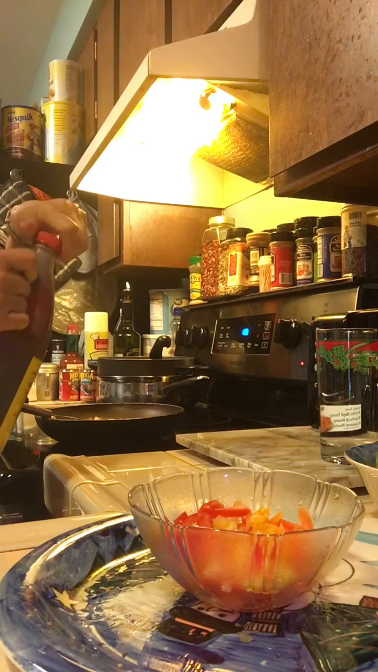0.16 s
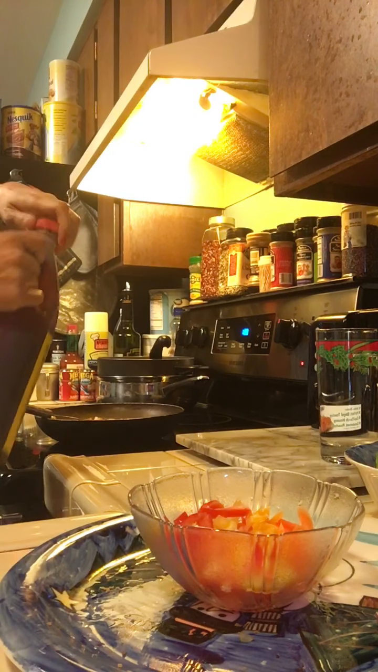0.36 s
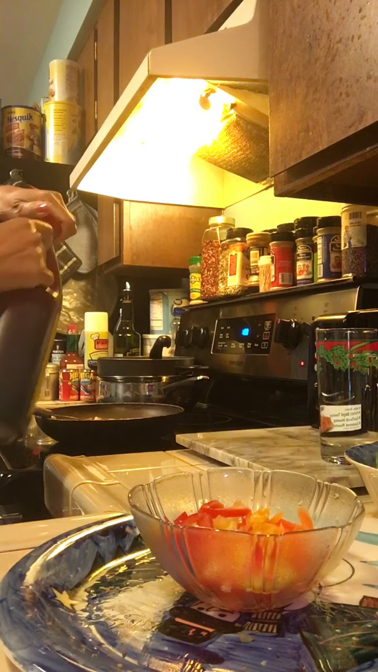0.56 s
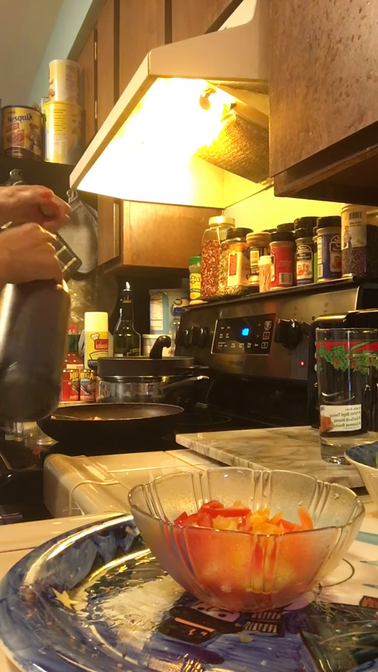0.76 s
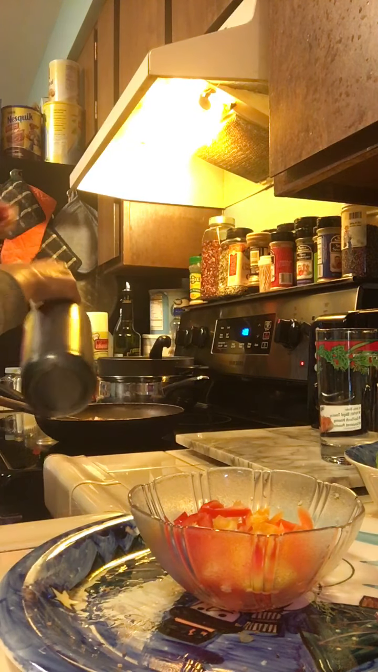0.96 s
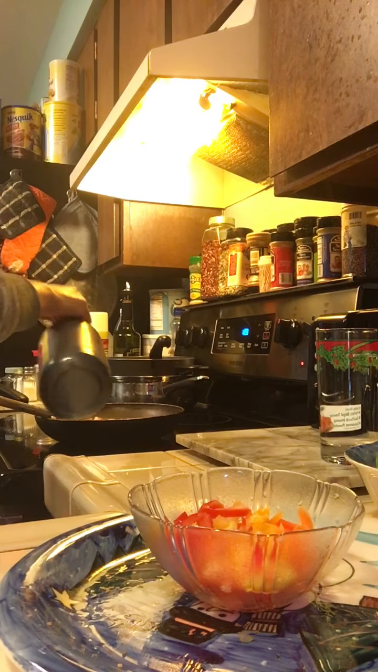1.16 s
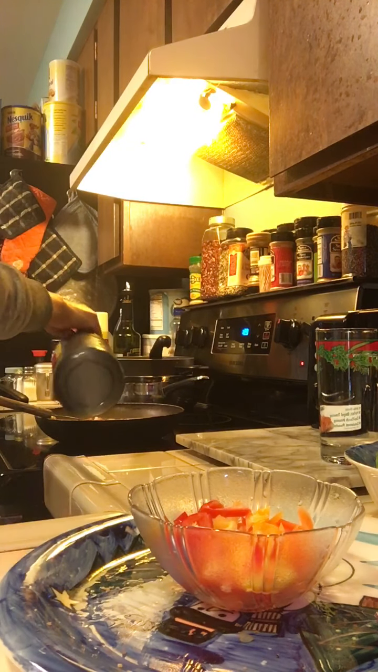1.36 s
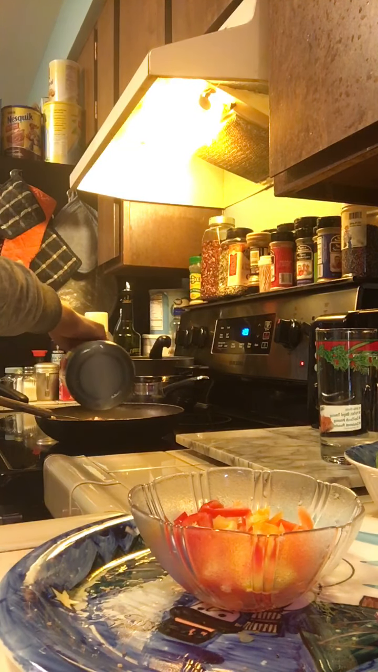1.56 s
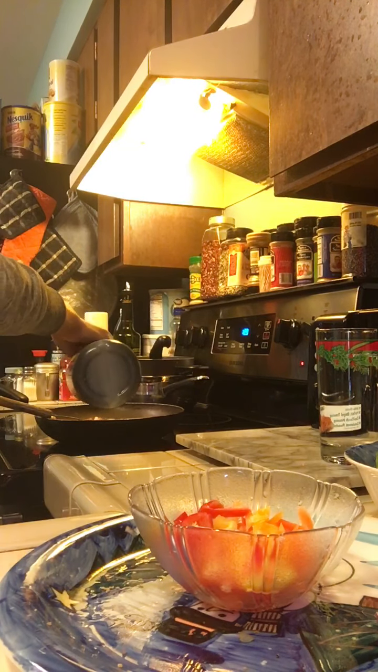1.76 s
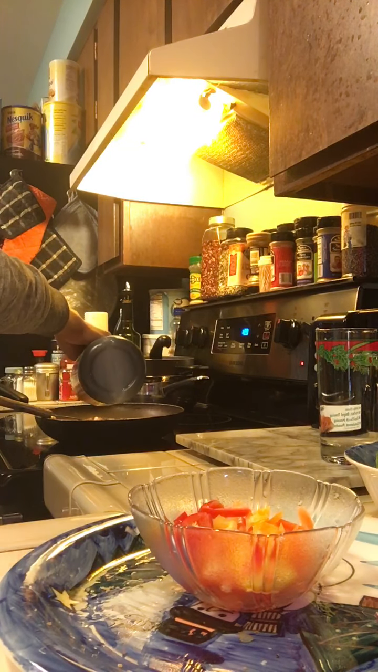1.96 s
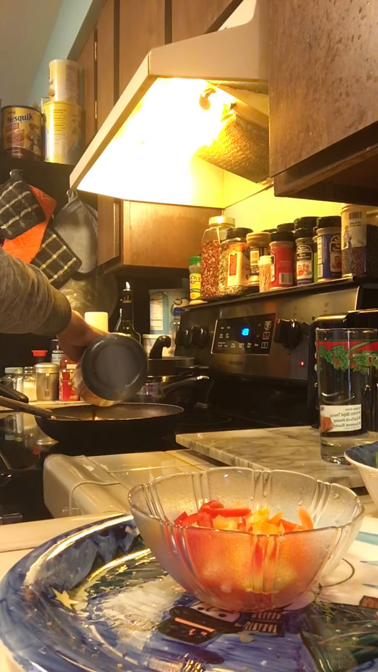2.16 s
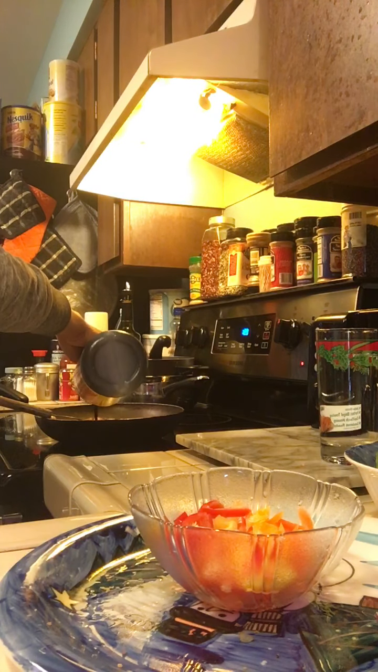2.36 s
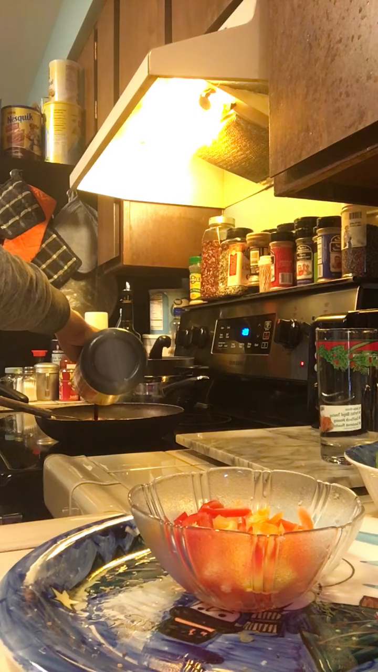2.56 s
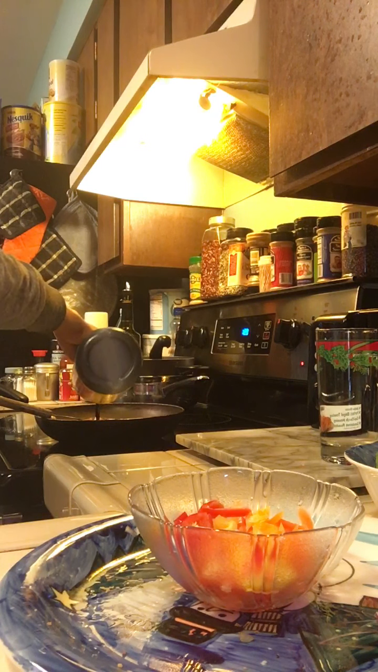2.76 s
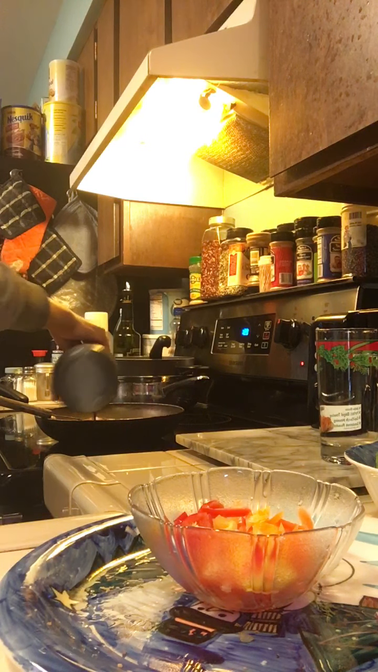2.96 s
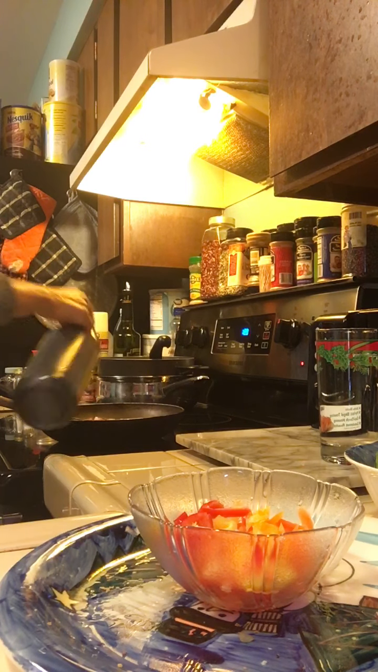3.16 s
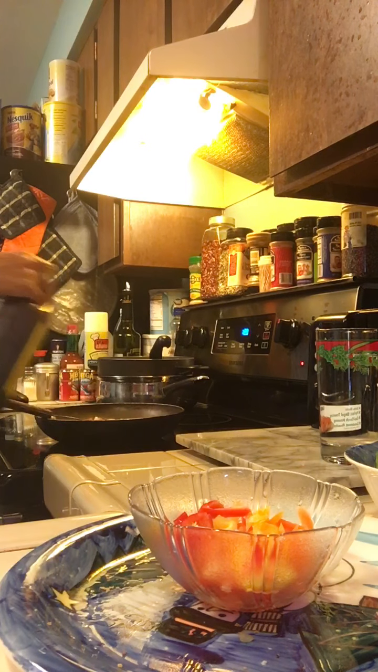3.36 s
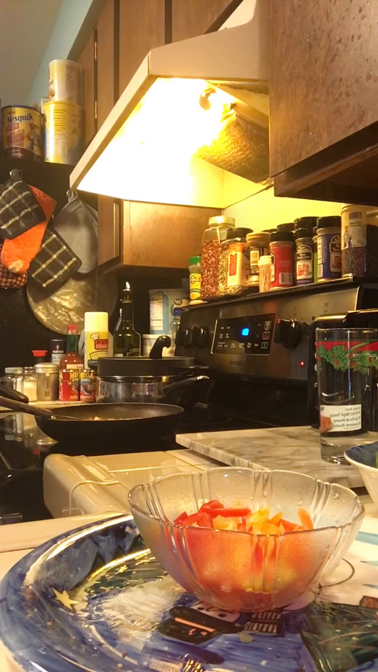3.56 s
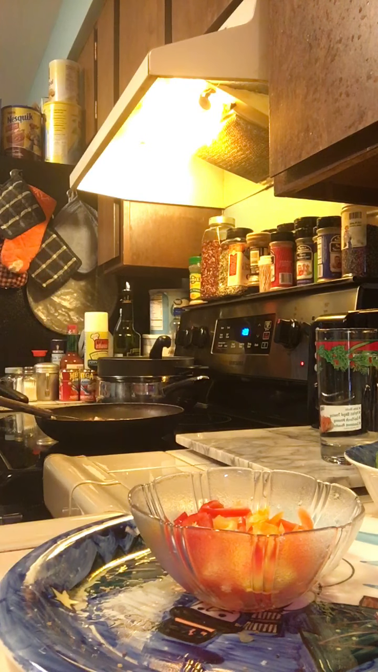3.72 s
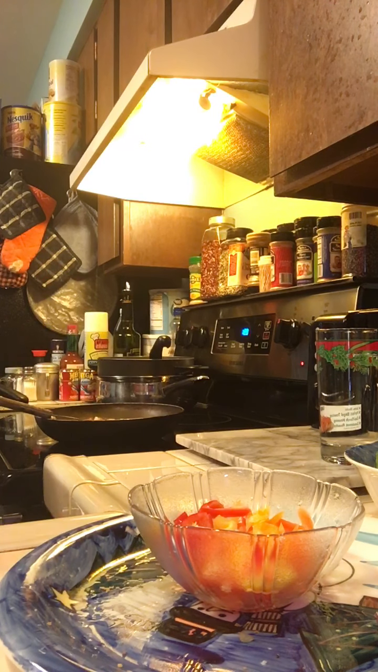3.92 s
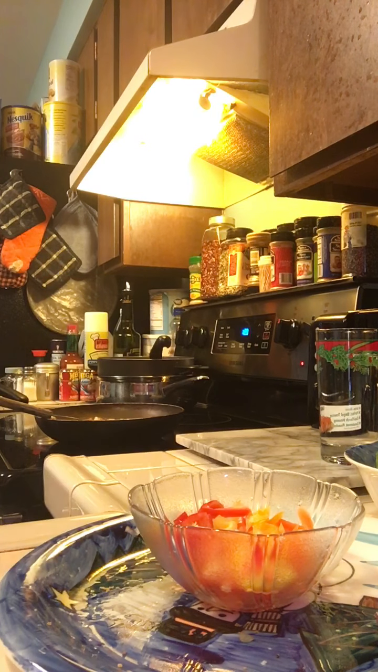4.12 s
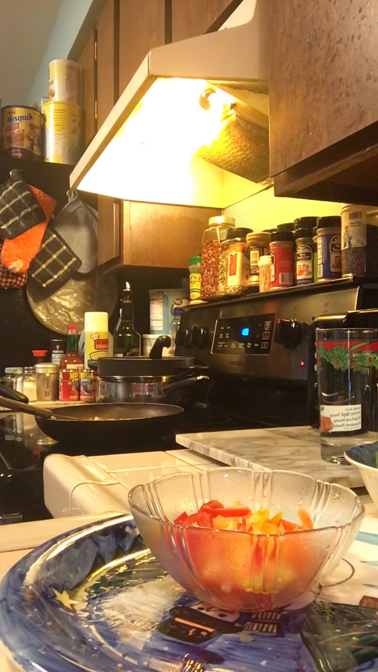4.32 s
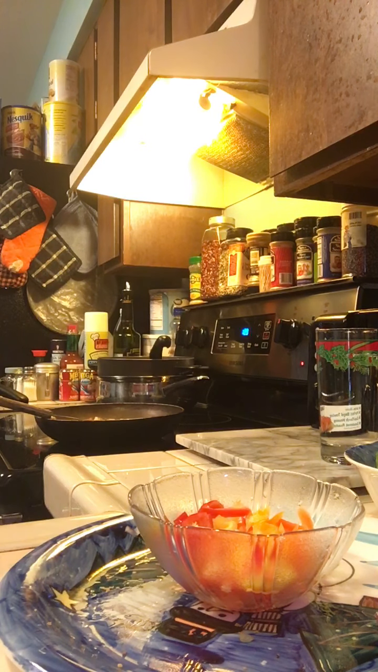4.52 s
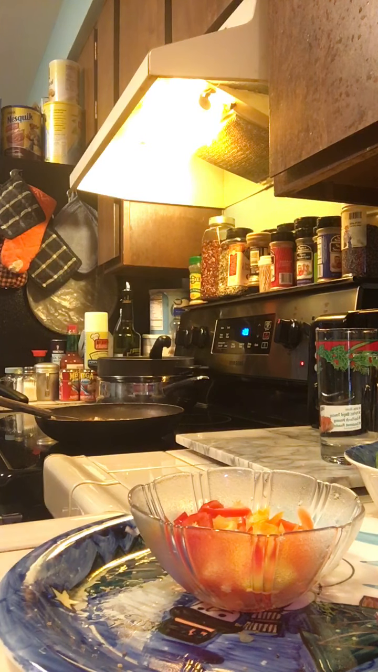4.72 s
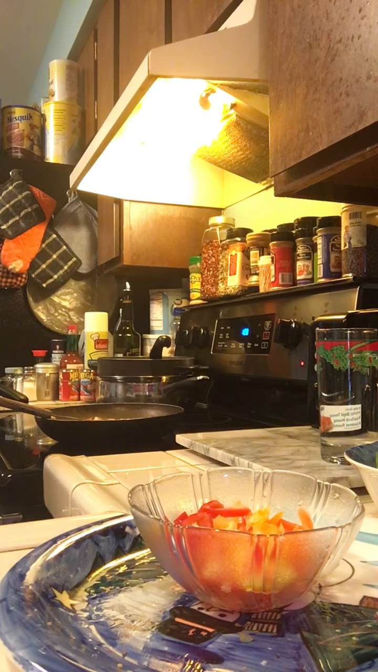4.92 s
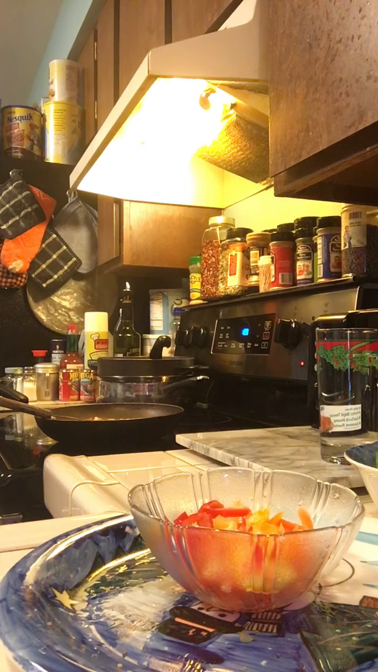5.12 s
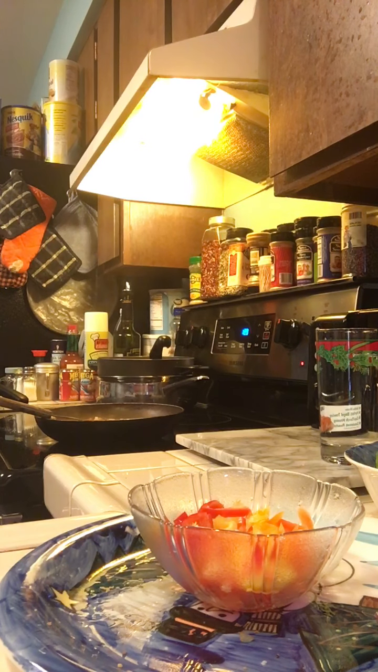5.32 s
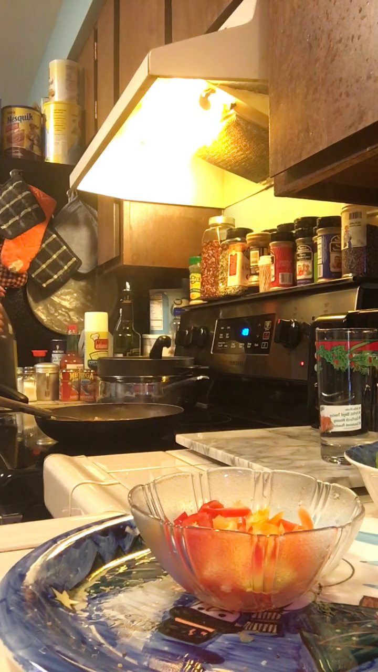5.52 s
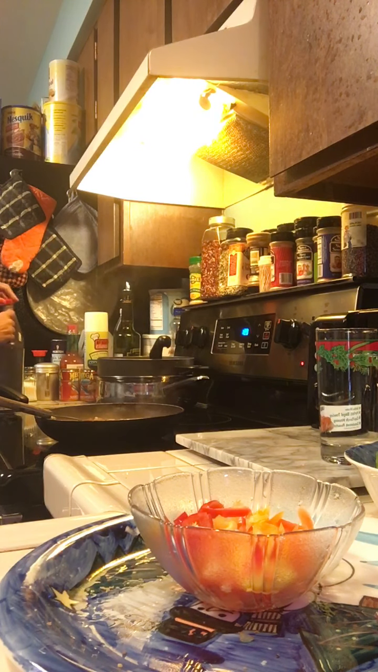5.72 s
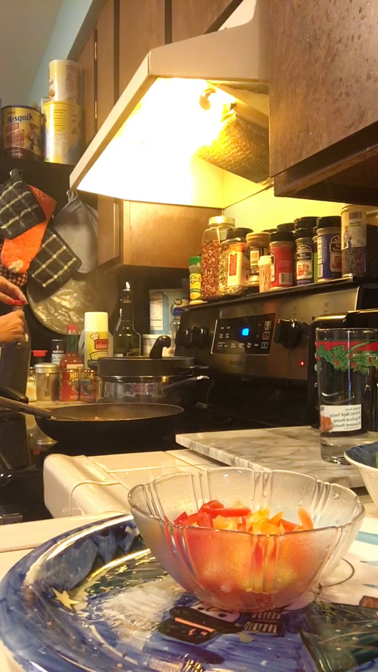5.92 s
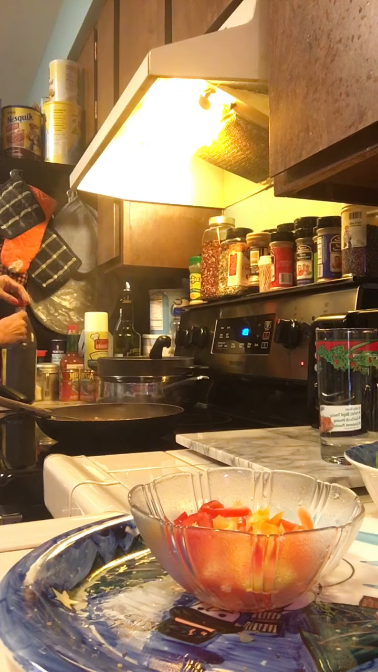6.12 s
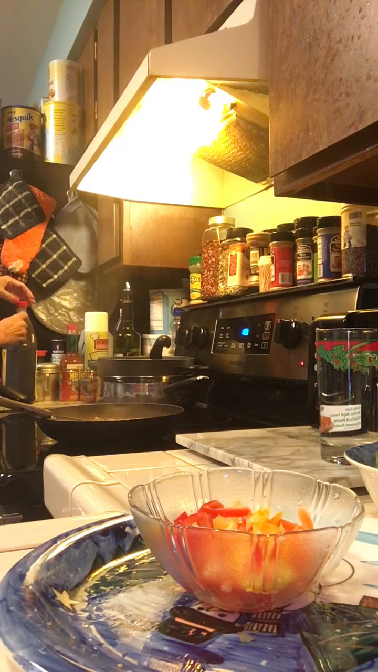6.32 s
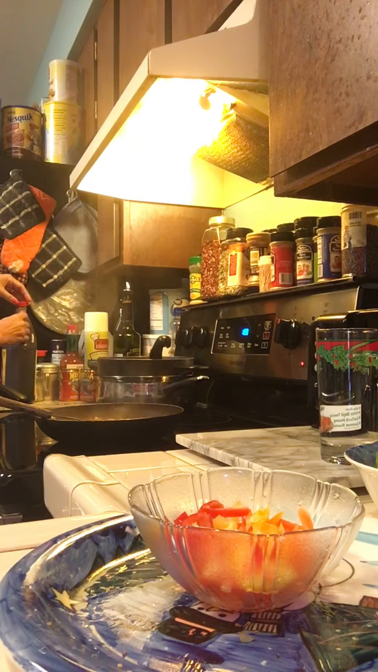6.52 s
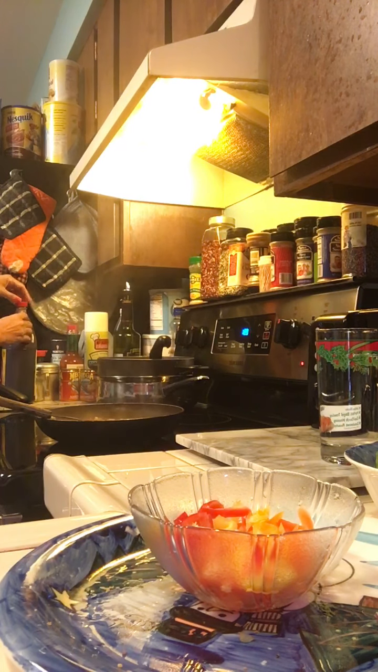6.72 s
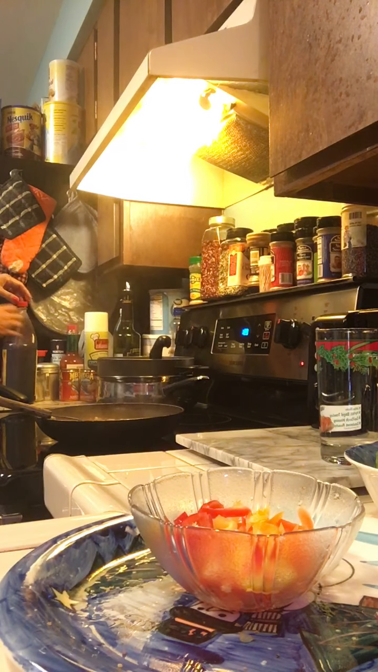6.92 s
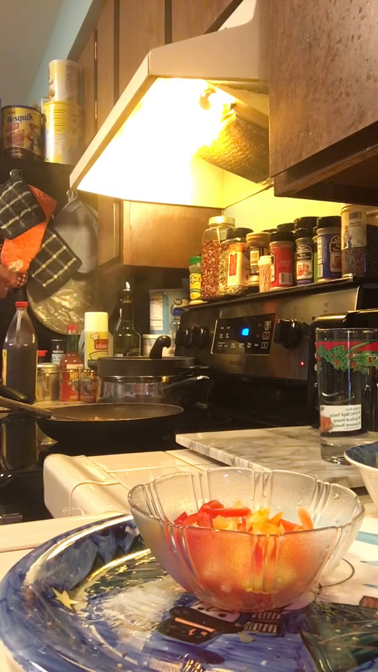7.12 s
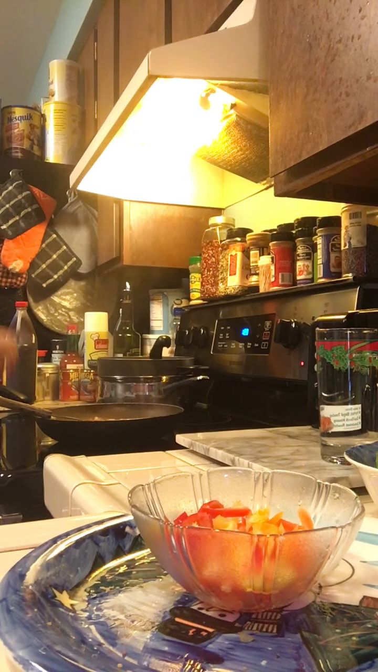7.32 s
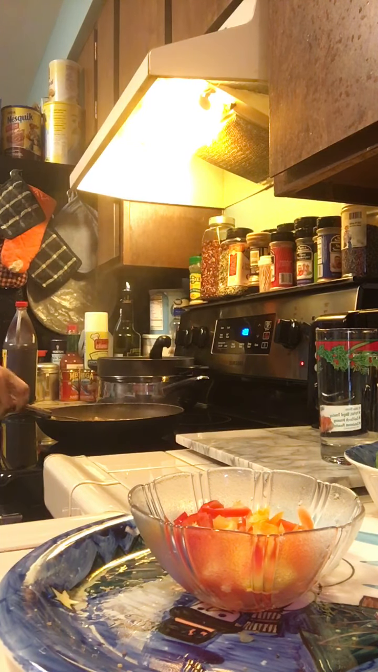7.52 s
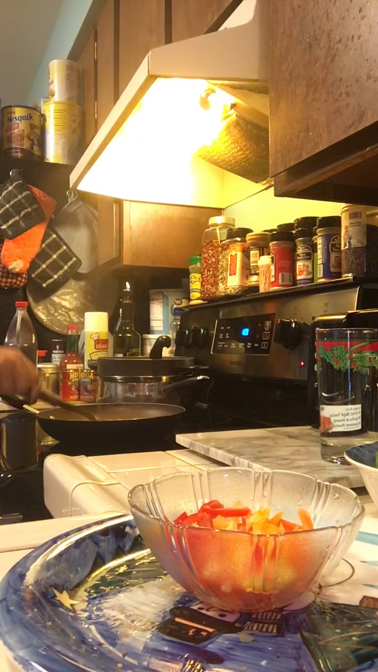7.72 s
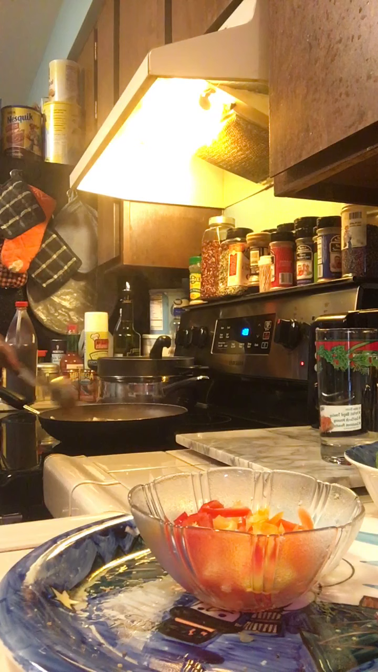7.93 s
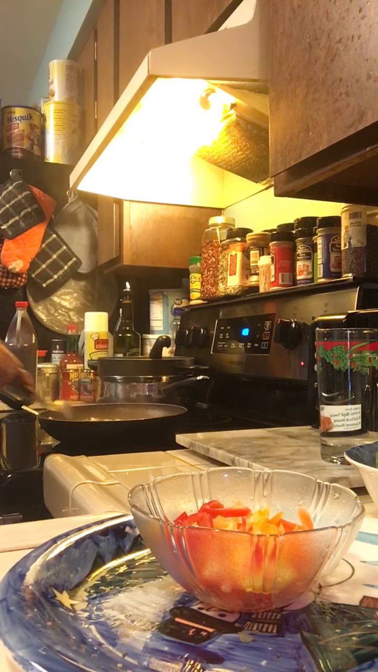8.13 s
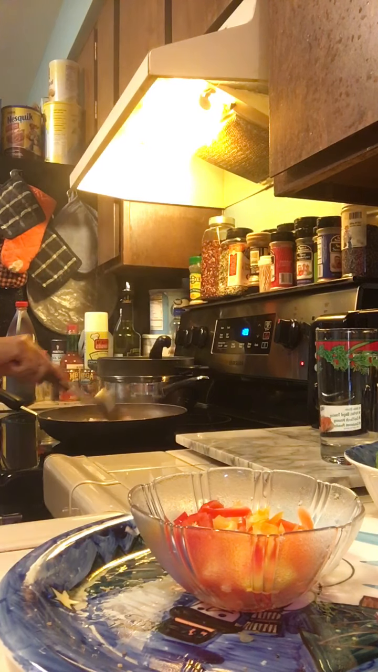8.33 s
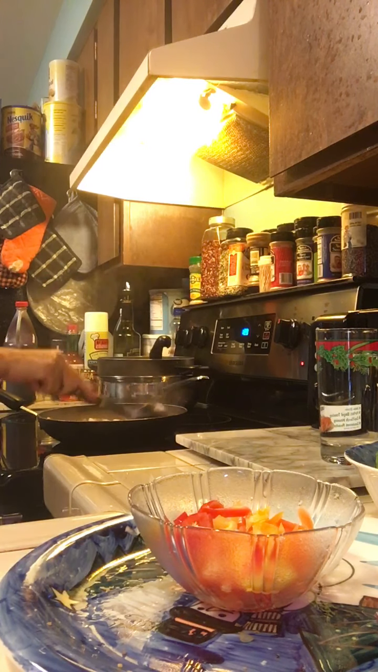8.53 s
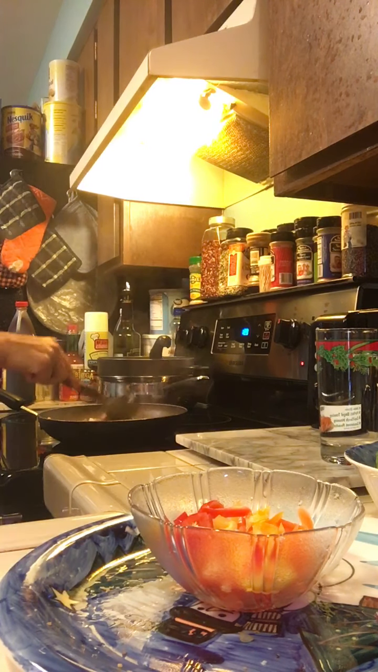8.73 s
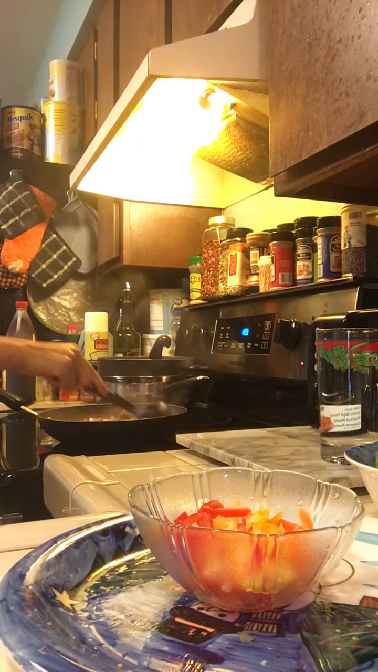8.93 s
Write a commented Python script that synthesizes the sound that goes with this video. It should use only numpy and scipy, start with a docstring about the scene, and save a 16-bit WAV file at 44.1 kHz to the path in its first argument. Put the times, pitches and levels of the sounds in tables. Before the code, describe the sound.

Quiet fan-like hum, soft cap twisting, and isolated fat pops over a barely audible fry. After about two seconds poured liquid starts fine crackling that grows quickly into a full wet sizzle, punctuated by loud spits. The boil eases a little; sharp plastic snaps close the bottle, soft bumps follow, then metallic spatula clicks and a short rattling scrape ring in the pan. Static microphone, close indoor kitchen.

```python
"""Sauce in a hot frying pan

A faint fry swells to a full sizzle as sauce is poured in: thousands of random bubble bursts, each a short ring.
Single large spits are built from a few quick tears. A bottle cap is twisted off and later back on: snaps and
grainy rubbing through resonances. A spatula knocks, scuffs and rattles on the pan, which rings in decaying tones.
Soft bumps are low rings; kitchen motors are wavering tones over the noise of moving air."""
import sys
import numpy as np
from scipy import signal
from scipy.fft import rfft, irfft
from scipy.io import wavfile

SR = 44100
rng = np.random.default_rng(int(sys.argv[2]) if len(sys.argv) > 2 else 0)


def dump(signal):
    """Clip the signal to [-1, 1] and save it as 16-bit WAV at the path in sys.argv[1]."""
    limited = np.clip(np.atleast_2d(signal).T, -1, 1)
    pcm = np.round(limited * 32767).astype(np.int16)
    wavfile.write(sys.argv[1], SR, pcm)


def makeup_ratio(level_db):
    """Linear amplitude ratio for a level in decibels (20 dB per factor of ten)."""
    decades = np.asarray(level_db, float) / 20
    return 10 ** decades


N = 396018  # length [samples]

# sauce boiling in the pan: (time [s], vigour [dB], fineness [steps], spatter of fat thrown out [dB])
# fineness above 0: a thin film makes small bubbles; below 0: a pool makes large ones
BOILING = [(2.31, -74, 1.5, 8), (2.345, -60, 1.5, 8), (2.43, -58, 1.9, 1), (2.47, -50, 1.5, -1),
           (2.73, -43, 1, -5.5), (3.0, -39.5, 0.51, -5), (3.38, -35.5, -0.14, 0), (3.5, -35, 0.89, 0.6),
           (3.95, -33, 0.39, -0.6), (4.9, -31, -0.011, 0.1), (5.4, -31.5, -0.32, 1.1),
           (6.4, -33, -0.066, -0.2), (7.5, -34, -0.38, 0.3), (7.9, -35.5, 0.089, 0), (8.3, -34, -0.6, 2.5),
           (8.55, -32.5, 0.34, 0.7), (8.98, -33, -0.32, 4.5)]
# bubble sizes, the last one a sparse wide crackle: (lowest pitch [Hz], highest pitch [Hz],
# bursts before flurries [per s], size spread [dB], ring decay [cycles], room t60 [s], level [dB])
BUBBLE_SIZES = [(1980, 4690, 2000, 3.5, 3.36, 0.41, -0.5), (660, 2050, 1600, 3.0, 3.4, 0.46, -5.5),
                (8260, 18800, 3000, 3, 3.3, 0.3, -5.5), (4570, 8240, 2000, 3.5, 4.46, 0.29, -4),
                (2440, 17600, 450, 2.5, 0.34, 0.088, -7)]
# faint fry before the sauce, one entry per bubble size: (level [dB])
FAINT_FRY_DB = [-57, -63.5, -63, -59, -74]
# what one step of fineness adds, one entry per bubble size: (change [dB])
FINENESS_DB = [0.9, -1.5, 3, 4, -1]
# how much spatter each bubble size takes; the finest bubbles and the crackle are thrown fat: (share [0 or 1])
SPATTER_SHARE = [0, 0, 1, 0, 1]
# brief surges and one small dip of the boil: (time [s], change [dB])
SURGES = [(2.342, 7), (2.455, 3), (2.52, 6.5), (2.70, 1), (2.965, -1.5), (3.42, 7.5), (3.51, 2), (3.66, 2),
          (3.79, 2)]
# overall colour from pan to microphone: (frequency [Hz], level per Hz [dB])
PAN_COLOUR = [(300, -22), (420, -6.5), (520, -10), (860, -17), (1050, -8), (1900, -5), (4200, -6),
              (4900, -9.5), (5700, -7.5), (7200, -4.5), (8200, -10.5), (9600, -11), (10450, -18),
              (11300, -12.5), (15800, -16)]
# resonances of pan and cooker alcove: (frequency [Hz], width [Hz], level [dB])
ALCOVE_RESONANCES = [(629, 16.6, -0.5), (947, 34, -2.5), (1206, 45, -4), (1350, 210, -2), (1585, 580, -3.5),
                     (1980, 69, 1.5), (2315, 57, -6), (2590, 62, -7.5), (2820, 155, -1.5), (3136, 27, 2.5),
                     (3540, 52, 0.5), (3950, 170, -2), (4350, 186, -0.5), (5150, 37, -0.5), (5350, 85, 2.5),
                     (6120, 970, -2), (11600, 700, -25)]
# echoes from pan rim, back wall and hood: (delay [s], level [dB], random scatter of the delay [s])
NEAR_ECHOES = [(.0013, -6, 0.00011), (.0031, -9, 0.00018), (.0054, -4, .0003)]
# large spits of fat and sauce: (time [s], peak [dB], pitch [Hz])
LARGE_SPITS = [(0.3267, -35, 7700), (0.4269, -35, 8700), (0.6888, -29.5, 6690), (0.8458, -28, 4060),
               (0.998, -39, 4040), (1.091, -34, 3970), (1.2785, -33, 3930), (1.3718, -36, 9600),
               (1.3992, -37, 8130), (1.519, -30, 12700), (1.5752, -31.5, 11600), (1.6705, -33, 1490),
               (1.729, -40, 2200), (1.7702, -27, 5380), (1.8248, -22, 5330), (1.9624, -22.5, 5340),
               (2.1869, -39, 3070), (2.263, -30, 4300), (2.3386, -36, 6390), (2.373, -38, 6200),
               (2.4029, -35, 5300), (2.4379, -31, 5150), (2.4593, -26.5, 5350), (2.5106, -29, 6270),
               (2.56, -33, 6300), (2.675, -25, 12900), (2.79, -32, 7000), (2.947, -24, 3580),
               (3.4294, -29, 3030), (3.5259, -20.5, 1430), (3.564, -30, 6470), (3.6141, -26, 2720),
               (3.6694, -20, 3540), (3.8762, -23, 2970), (4.7544, -16, 4310), (5.0394, -13.5, 3300),
               (5.109, -21, 4020), (6.7794, -17, 6240)]
# bottle cap snapping over its thread: (time [s], peak [dB], pitch [Hz])
CAP_SNAPS = [(0.092, -43, 1440), (0.164, -33, 1460), (0.197, -34, 940), (0.41, -28, 4570),
             (0.467, -30, 2080), (0.481, -33, 4310), (0.497, -38, 1910), (6.101, -22.5, 1090),
             (6.149, -13.5, 1900), (6.169, -20.5, 1040), (6.213, -18, 1200)]
# cap rubbing on its thread: (start [s], length [s], level [dB], fade over the stroke [dB])
CAP_RUBS = [(0.03, 0.086, -50.5, -6), (0.162, 0.041, -44, -3), (0.195, 0.035, -44, -11),
            (0.408, 0.071, -49.5, -4), (0.464, .16, -40, -11), (6.09, .17, -38.5, 0)]
# resonances of cap and bottle neck: (frequency [Hz], width [Hz], level [dB])
BOTTLE_RESONANCES = [(800, 250, -6), (1400, 94, 7), (1590, 970, 6.5), (2030, 130, 6), (3080, 70, 4),
                     (3950, 180, 4), (4500, 1600, -3), (5340, 270, -2)]
# spatula on the pan: (time [s], click peak [dB], thud peak [dB], contact pitch [Hz])
SPATULA_KNOCKS = [(7.4705, -17.5, -52, 1420), (7.794, -25, -50, 2880), (8.0565, -18, -46, 900),
                  (8.1055, -18, -42, 1400), (8.5415, -12, -22, 950), (8.592, -26, -34, 700),
                  (8.958, -21, -29, 1000), (8.971, -23, -38, 3680)]
# ringing modes of the pan: (frequency [Hz], level [dB], t60 [s])
PAN_MODES = [(161, 3.5, 0.13), (211, 5.5, 0.048), (320, 0, 0.09), (432, -6, 0.18), (650, -19, 0.026),
             (950, -20, 0.02), (1450, 1.5, 0.021), (2200, 2, 0.021), (3570, -3, 0.047), (5300, -33, .02)]
# spatula scuffing and rattling on the pan: (start [s], length [s], level [dB], fade over the stroke [dB])
SPATULA_SCRAPES = [(8.05, 0.058, -50, 0), (8.105, .24, -41, -11), (8.552, 0.15, -34, -15.5)]
# things set down on the worktop: (time [s], ring level [dB], pitch [Hz])
WORKTOP_BUMPS = [(5.75, -39, 120), (6.979, -43, 130), (7.719, -34, 54.5), (7.8, -44, 45)]
# motor tones: (frequency [Hz], rms level [dB], waver [dB])
MOTOR_TONES = [(59.17, -48.6, .5), (77.1, -54.8, .8), (101.8, -67, 2), (177.5, -63.5, 1.5),
               (239.85, -60, 1.5), (1184, -72, 1)]
# spectrum of the moving air: (frequency [Hz], level per Hz [dB])
AIR_SPECTRUM = [(18, -33), (30, -15), (70, -21), (87, -3.5), (140, -14), (236, -6.5), (373, -10.5),
                (544, -24), (620, -20), (918, -20.5), (1030, -24), (1170, -22), (1500, -24), (1950, -58),
                (3300, -120)]

AIR_DB = -55.5  # rms level of the moving air
ROOM_DB, ROOM_T60_S = 1.5, 0.25  # usual room tail beside the direct sound
SHARP_ROOM_DB = -5  # room tail of a single sharp sound
SURGE_RISE_S, SURGE_FALL_S = 0.0067, 0.013
# how long a spit tears, how sharp the tear is against the ring: (in bare fat, in sauce)
SPLUTTER_S, CRACK = (.0015, .004), (2.9, 1.8)
GRIP_S, LET_GO_S = 0.0055, .02  # how fast a rubbing contact starts and stops


def evened(x):
    """Scales a sound to rms 1."""
    return x / np.sqrt(np.mean(x ** 2) + 1e-20)


def read(points, hz):
    """Looks a spectrum up on a log-frequency axis."""
    f, value = np.transpose(points)
    return np.interp(np.log(hz + 1), np.log(f + 1), value)


def curve(rows, index):
    """Draws one column of a table as a line through time, sample by sample."""
    rows = np.array(rows)
    return np.interp(np.arange(N) / SR, rows[:, 0], rows[:, index])


def add(mix, s, sound):
    """Mixes a sound in at time s."""
    part = mix[round(s * SR):][:len(sound)]
    part += sound[:len(part)]


def slow(top_hz):
    """Random wandering of rms 1 that flutters up to about top_hz, without drift."""
    count = N // 64 + 1  # one value for every 64 samples
    hz = np.fft.rfftfreq(count, 64 / SR)
    shape = hz / (hz + .3 * top_hz) / (1 + (hz / top_hz) ** 4)
    wander = irfft(rfft(rng.standard_normal(count)) * shape, count)
    return np.repeat(evened(wander), 64)[:N]


def causal(power):
    """Turns a power spectrum of 2049 bins into a filter that responds as early as it can (minimum phase)."""
    cepstrum = irfft(np.log(power + 1e-10) / 2)
    cepstrum[1:2048] *= 2
    cepstrum[2049:] = 0
    return irfft(np.exp(rfft(cepstrum)))[:2048]


def peaks(table, hz):
    """Adds up the power of a set of resonances."""
    return sum(makeup_ratio(2 * db) / (1 + (2 * (hz - f) / width) ** 2) for f, width, db in table)


def ring(hz, cycles, glide=0.29):
    """A bursting bubble: a soft start, a few cycles, rising pitch as the cavity closes."""
    u = np.arange(0, 6 * cycles, hz / SR)  # time in cycles
    tone = np.sin(2 * np.pi * u * (1 + glide * u / cycles / 6))
    soft_start = 1 - np.exp(-(u / 0.24) ** 2)
    return tone * np.exp(-u / cycles) * soft_start


def placed(sound, t60=ROOM_T60_S, room_db=ROOM_DB):
    """Adds near echoes and a random, dying room tail, as from one random spot in the pan."""
    t = np.arange(round(.16 * SR)) / SR
    path = rng.standard_normal(len(t)) * makeup_ratio(-60 * t / t60) * np.clip(t / 0.0085, 0, 1)
    path *= makeup_ratio(room_db) / np.linalg.norm(path)
    path[0] = 1  # direct sound
    for (delay, db, scatter), chance in zip(NEAR_ECHOES, rng.standard_normal(len(NEAR_ECHOES))):
        path[max(round((delay + scatter * chance) * SR), 1)] += makeup_ratio(db)
    return signal.fftconvolve(sound, path)


def alcove():
    """The fixed colour that pan and alcove resonances give to the boil and spits."""
    hz = np.fft.rfftfreq(4096, 1 / SR)
    overall = makeup_ratio(2 * read(PAN_COLOUR, hz))
    return causal(.5 * overall + .5 * peaks(ALCOVE_RESONANCES, hz))


def sizzle(colour, count=15):
    """Random bursts of four bubble sizes and a sparse wide crackle, in flurries that all sizes share."""
    flurry = makeup_ratio(1.2 * slow(18) + 2.5 * slow(50))
    out = np.zeros(N)
    for kind, (lo_hz, hi_hz, per_s, spread_db, cycles, t60, _) in enumerate(BUBBLE_SIZES):
        bubbles = np.zeros(N)
        for hz in np.geomspace(lo_hz, hi_hz, 2 * count + 1)[1::2]:
            when, size = rng.random((2, N))
            patch = flurry * makeup_ratio(1.8 * slow(14))  # each patch of the pan boils at its own pace
            bursts = when < per_s * patch / count / SR
            strength = makeup_ratio(-spread_db * np.log(np.maximum(size, 1 / 60)))  # few are much louder
            grain = placed(ring(hz, cycles), t60)
            grain = grain / np.linalg.norm(grain) * np.sqrt(hz)
            bubbles += signal.oaconvolve(bursts * strength, grain)[:N]
        out += boil(kind) * evened(signal.oaconvolve(bubbles, colour)[:N])
    return out


def boil(size):
    """Loudness of one bubble size: the faint fry, then the sauce with its brief surges and one small dip."""
    t = np.arange(N) / SR
    surges = np.array(SURGES)
    since = t - surges[:, :1]
    rise = np.clip(since / SURGE_RISE_S, 0, 1)
    fall = np.exp(-np.maximum(since, 0) / SURGE_FALL_S)
    sauce_db = curve(BOILING, index=1) + BUBBLE_SIZES[size][-1]
    sauce_db += FINENESS_DB[size] * curve(BOILING, index=2)
    sauce_db += SPATTER_SHARE[size] * curve(BOILING, index=3)
    sauce_db += surges[:, 1] @ (rise * fall)
    sauce = (t > BOILING[0][0]) * makeup_ratio(sauce_db)
    return np.hypot(makeup_ratio(FAINT_FRY_DB[size]), sauce)


def spits(colour, count=5):
    """Single large bursts: a few quick tears of the film, each a short ring with a wide crack."""
    out = np.zeros(N)
    for (s, db, hz), chance in zip(LARGE_SPITS, rng.random((len(LARGE_SPITS), 2, count))):
        wet = int(s > BOILING[0][0])  # 1 once the sauce is in
        burst = ring(hz, 1.0)
        burst[1:3] += CRACK[wet] * np.array([1, -.3])  # the tear is sharp and bright
        splutter = np.zeros(round(SPLUTTER_S[wet] * SR) + 1)
        splutter[(chance[0] * len(splutter)).astype(int)] = 0.19 + chance[1]
        splutter[0] = 1.0
        burst = placed(np.convolve(burst, splutter), 0.22, SHARP_ROOM_DB)
        burst = signal.fftconvolve(burst, colour)
        add(out, s, makeup_ratio(db) * burst / abs(burst).max())
    return out


def spatula(split_hz=520):
    """Blows ring the pan's high modes as a click and its low ones as a thud; scuffs rattle mostly the low."""
    t = np.arange(round(.3 * SR)) / SR
    click, thud = np.zeros((2, len(t)))
    for hz, db, t60 in PAN_MODES:
        part = click if hz > split_hz else thud
        part += makeup_ratio(db - 60 * t / t60) * np.sin(2 * np.pi * hz * t)
    thud *= 1 - np.exp(-(t / 0.0042) ** 2)  # the heavy base takes longer to move
    edge = signal.butter(2, (900, 5500), "band", fs=SR)
    out = np.zeros(N)
    for s, click_db, thud_db, hz in SPATULA_KNOCKS:
        blow = click.copy()
        add(blow, 0, 2.3 * ring(hz, 1.1))  # the contact itself
        chatter = signal.lfilter(*edge, rng.standard_normal(len(t)))
        blow += 2.8 * makeup_ratio(-60 * t / .05) * chatter  # the hard edge chatters
        blow = placed(blow, 0.53, SHARP_ROOM_DB)
        add(out, s, makeup_ratio(click_db) * blow / abs(blow).max())
        add(out, s, makeup_ratio(thud_db) * thud / abs(thud).max())
    slips = rng.standard_normal(N) * makeup_ratio(1.9 * slow(72))
    rattle = (np.gradient(thud) + 0.0083 * click) * makeup_ratio(-60 * t / 0.046)
    return out + strokes(SPATULA_SCRAPES) * evened(signal.oaconvolve(slips, rattle)[:N])


def cap():
    """Snaps and grainy rubbing, both through the plastic of cap and bottle neck."""
    body = causal(peaks(BOTTLE_RESONANCES, np.fft.rfftfreq(4096, 1 / SR)))
    out = np.zeros(N)
    for s, db, hz in CAP_SNAPS:
        snap = body / abs(body).max()
        add(snap, 0, 0.4 * ring(hz, 6.5))
        snap = placed(snap, 0.34, SHARP_ROOM_DB)
        add(out, s, makeup_ratio(db) * snap / abs(snap).max())
    grit = rng.standard_normal(N) * makeup_ratio(3.2 * slow(90))
    rub = evened(signal.oaconvolve(grit, body)[:N])
    return out + rub * strokes(CAP_RUBS)


def strokes(table):
    """Loudness of a contact that grips, fades and lets go; silent outside its strokes."""
    gain = np.zeros(N)
    for s, length, db, fade_db in table:
        t = np.arange(0, length, 1 / SR)
        contact = np.minimum(np.minimum(t / GRIP_S, (length - t) / LET_GO_S), 1)
        add(gain, s, makeup_ratio(db + fade_db * t / length) * contact)
    return gain


def bumps():
    """Soft low pushes through the worktop, each a short ring."""
    out = np.zeros(N)
    for s, db, hz in WORKTOP_BUMPS:
        add(out, s, makeup_ratio(db) * ring(hz, 1.3, glide=.05))
    return out


def kitchen():
    """Motor tones that waver a little in loudness, over the shaped noise of moving air."""
    t = np.arange(N) / SR
    tones = np.zeros(N)
    for hz, db, waver_db in MOTOR_TONES:
        level = np.sqrt(2) * makeup_ratio(db + waver_db * slow(1.3))  # root 2 turns rms into peak
        tones += level * np.sin(2 * np.pi * (hz * t + rng.random()))
    shape = makeup_ratio(read(AIR_SPECTRUM, np.fft.rfftfreq(N, 1 / SR)))
    air = irfft(rfft(rng.standard_normal(N)) * shape, N)
    return tones + makeup_ratio(AIR_DB) * evened(air)


def scene():
    """All sources at one microphone, the same on both channels."""
    colour = alcove()
    mix = sizzle(colour) + spits(colour) + spatula() + cap() + bumps() + kitchen()
    return np.tile(mix, (2, 1))


def top_cut(x):
    """Nothing passes above the cut-off."""
    return signal.sosfilt(signal.butter(12, 16880, fs=SR, output="sos"), x)


def record(dry):
    """The microphone loses the deepest bass, and a steep filter cuts the highest treble."""
    roll_off = signal.butter(2, 42, "high", fs=SR, output="sos")
    lean = signal.sosfilt(roll_off, dry)
    band_limit = signal.firwin(801, 15730, window=("kaiser", 8), fs=SR)
    mix = signal.oaconvolve(lean, band_limit[None], "same")
    return top_cut(mix)


dry = scene()
out = record(dry)
dump(out)
```